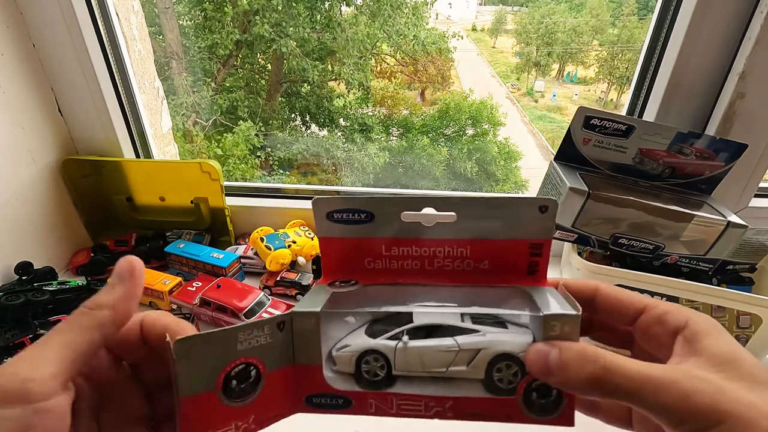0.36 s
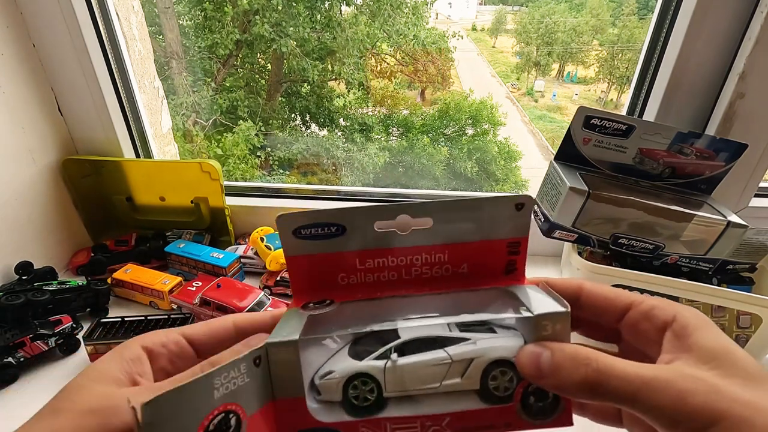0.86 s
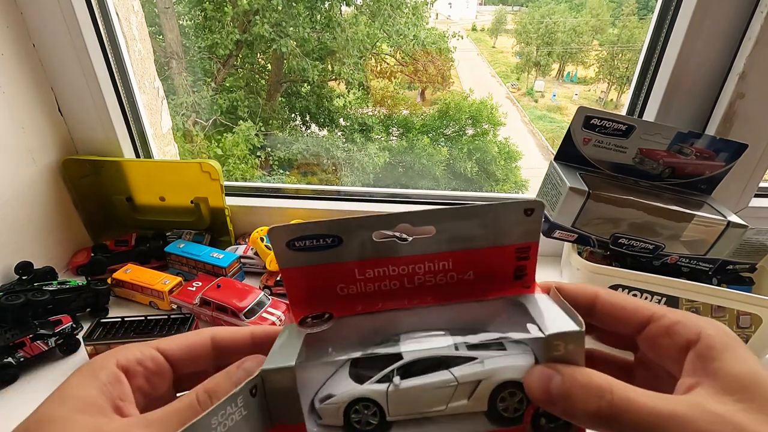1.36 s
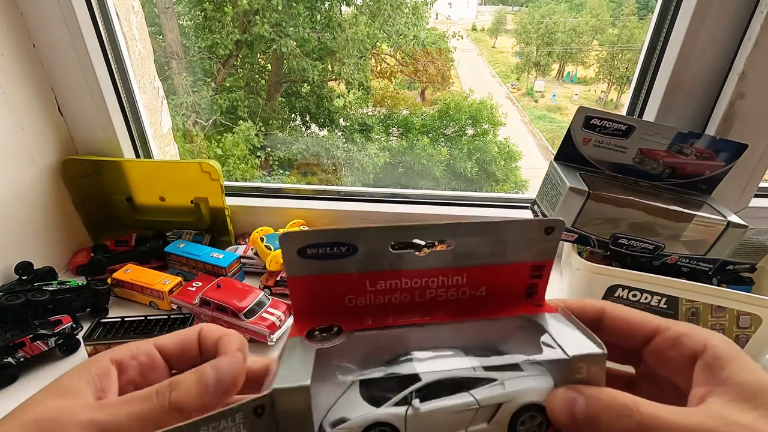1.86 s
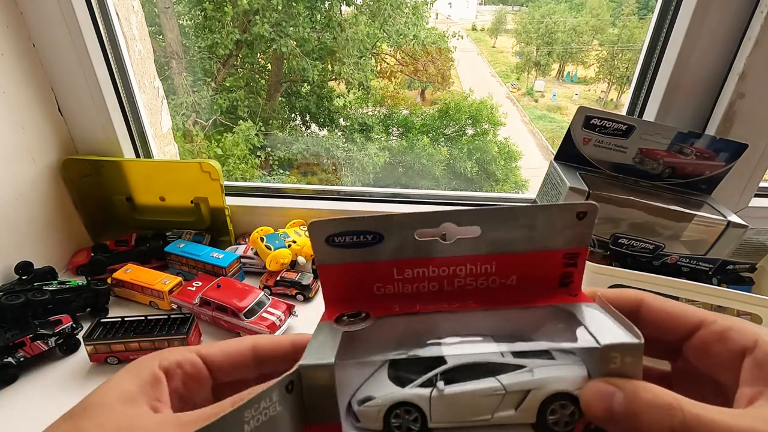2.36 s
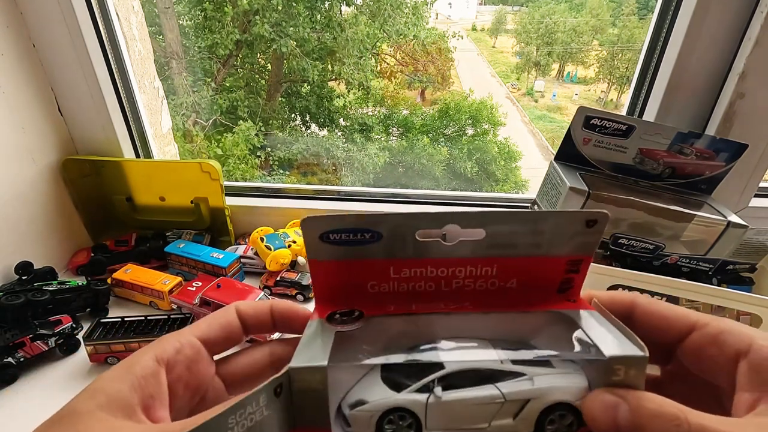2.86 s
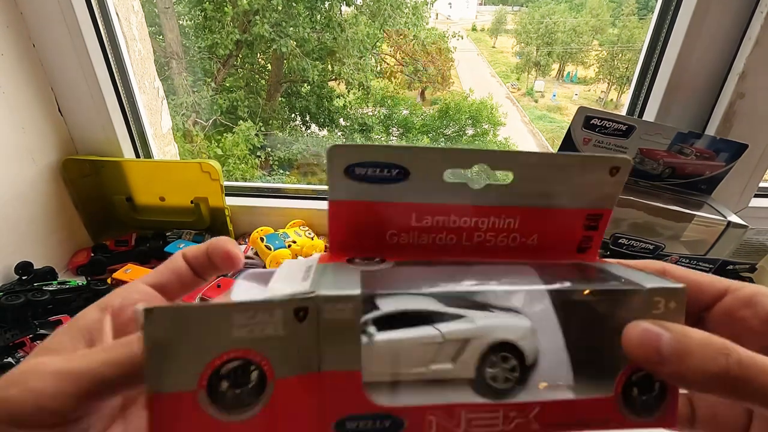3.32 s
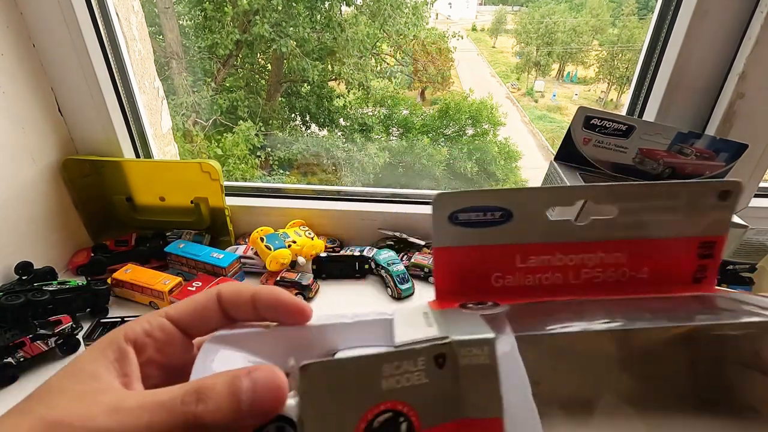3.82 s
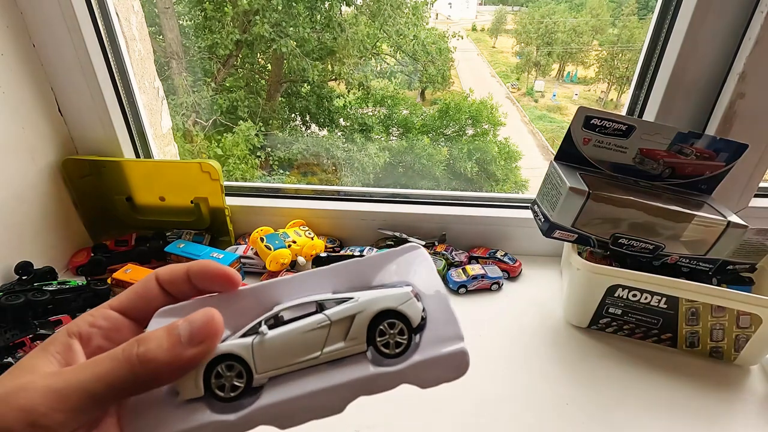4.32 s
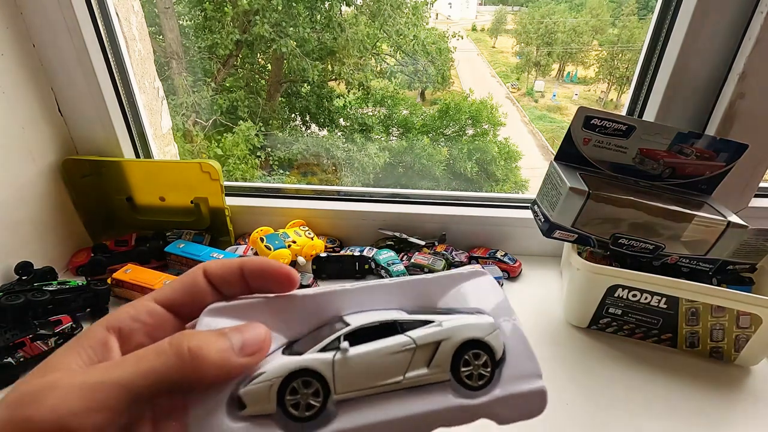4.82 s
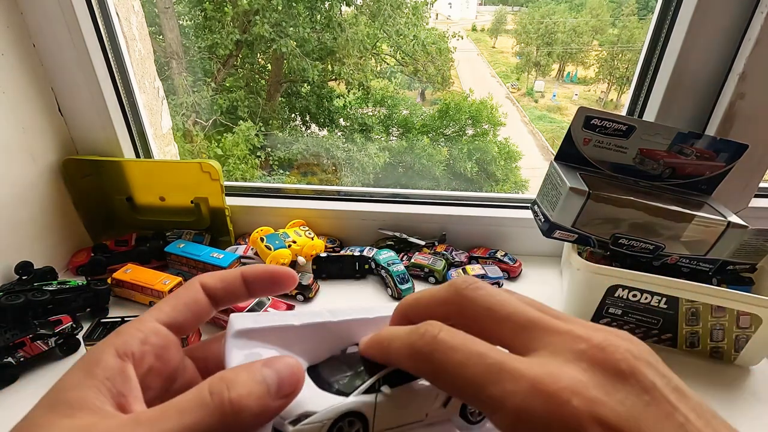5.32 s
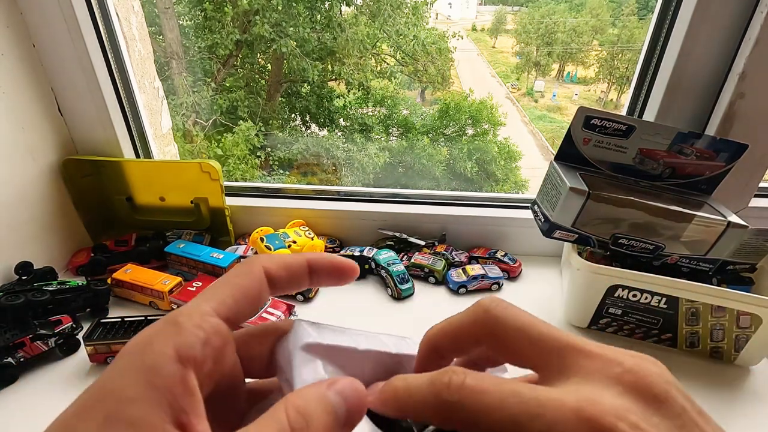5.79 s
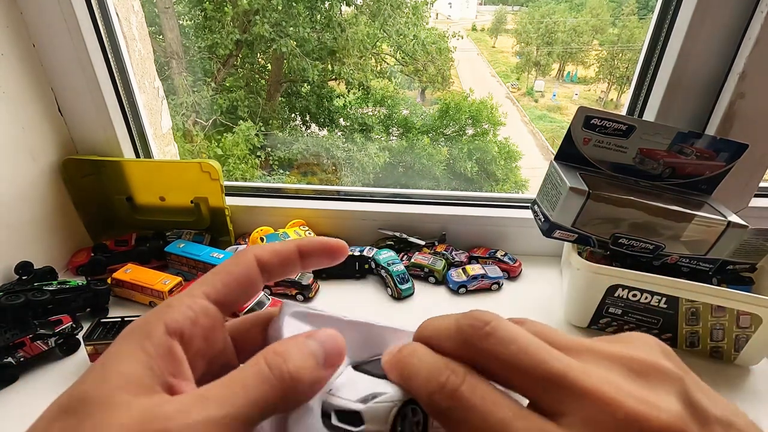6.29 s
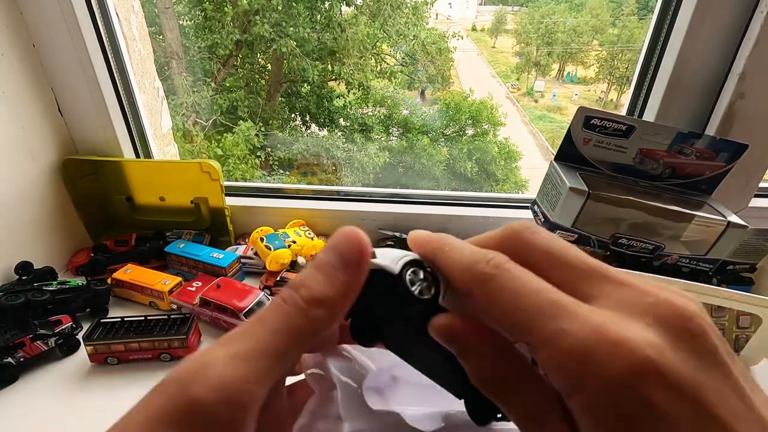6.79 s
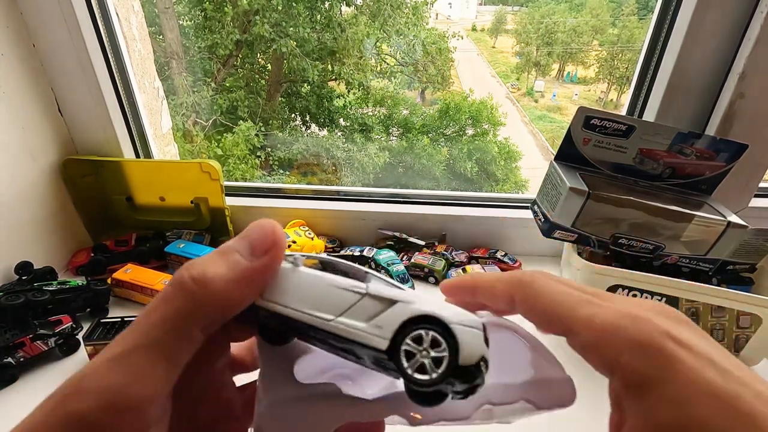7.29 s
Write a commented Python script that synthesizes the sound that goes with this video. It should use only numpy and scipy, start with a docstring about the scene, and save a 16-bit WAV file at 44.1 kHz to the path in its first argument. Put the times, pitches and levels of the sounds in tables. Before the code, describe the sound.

A small carton is worked open by hand, close to a stereo camera microphone: dry card cracks, short rubs, boxy thuds and pauses. The busiest stretch is the tray scraping out midway, ending with a knock on the sill. Then brittle plastic clicks grow into a dense crackle as a toy car is pried out, and light ticks of the bare tray follow. Faint room hum, very short dull reflections.

```python
"""On a window sill, hands open a small cardboard box, slide out a thin plastic tray and prise a metal toy car from it.
Card snaps and plastic pops are short noise bursts through a resonance, with ringing body modes and a treble crack.
Rubbing is stick-slip ticks through the modes of card, then tray, with dry hiss and a stirring hollow.
Thumps are sagging booms over damped box and sill modes; a bent flap groans as a gliding sine.
A quiet room hums behind as coloured noise, and decaying noise tails give the reflections."""
import sys
import numpy as np
from scipy import signal
from scipy.fft import rfft, irfft, next_fast_len
from scipy.io import wavfile
from scipy.ndimage import uniform_filter1d

SR = 44100
rng = np.random.default_rng(int(sys.argv[2]) if len(sys.argv) > 2 else 0)


def generate_wav(sig):
    """Save sig (samples, or channels by samples) to the path in sys.argv[1] as 16-bit PCM at SR."""
    pcm = np.round(np.clip(np.atleast_2d(sig).T, -1, 1) * 32767).astype(np.int16)
    wavfile.write(sys.argv[1], SR, pcm)


def attenuation_scalar(level_db):
    """Turn a level in dB into a linear amplitude multiplier (20 dB per decade)."""
    decades = np.asarray(level_db, float) / 20
    return 10 ** decades


N = 337806

# Colour of the outdoor wash and low hum. Each row: frequency in Hz, relative level in dB.
ROOM_TONE_COLOUR = [(15, -63), (28, -8), (70, -20.5), (108, -35.5), (173, -8), (197, -16.5), (235, -20.5),
                    (380, -32), (800, -47), (1540, -27), (2400, -52.5), (7400, -53.5), (12000, -74)]
# Colour of the difference between the channels. Each row: frequency in Hz, gain in dB.
SIDE_COLOUR = [(30, -17), (500, -10.5), (1500, -7.5), (4000, -5.5), (8000, -9), (14000, -2)]
# Share of the sound that leans to the right, most in bass and mids. Each row: frequency in Hz, gain in dB.
RIGHT_LEAN = [(30, -20), (700, -17.5), (3000, -23), (8000, -40)]
# A bent flap flexing back. Each row: start in seconds, length in seconds, from Hz, to Hz, level in dB.
GROANS = [(1.552, 0.053, 200, 337, -44)]
# Fingers, flaps and tray sliding.
# Each row: start in seconds, end in seconds, start level in dB, end level in dB, hiss in dB re level.
SLIDES = [(0.0, 0.07, -31.5, -29.5, -11.5), (0.113, 0.508, -45, -57, -8.5),
          (0.586, 0.598, -62.5, -55.5, -7.5), (0.804, 0.869, -65, -70.5, -7.5),
          (0.942, 1.039, -62, -61.5, -12.5), (1.162, 1.184, -61.5, -63, -17),
          (1.638, 1.758, -54.5, -69, -9), (1.851, 1.896, -59, -55, -5.5), (2.045, 2.144, -67.5, -58, -7.5),
          (2.197, 2.297, -40.5, -48, -14.5), (2.404, 2.576, -48, -58, -16.5), (2.635, 2.876, -44, -55, -9),
          (2.755, 3.057, -76, -46.5, -17), (3.112, 3.156, -33.5, -35.5, -11.5),
          (3.27, 3.378, -50, -37, -25), (3.383, 3.444, -28.5, -26.5, -12.5),
          (3.444, 3.502, -27, -28.5, -11), (3.568, 3.681, -31.5, -41, -15),
          (3.764, 3.799, -36.5, -35.5, -9.5), (3.828, 3.981, -39.5, -26.5, -9.5),
          (4.034, 4.139, -47, -64, 0), (4.427, 4.474, -61, -55, -14.5), (4.668, 4.819, -25.5, -56.5, -14.5),
          (5.176, 5.186, -34, -38, -14), (5.408, 5.519, -46.5, -60.5, -3.5),
          (5.744, 5.807, -65, -56.5, -7.5), (5.942, 6.036, -69.5, -51, -17), (6.127, 6.215, -61.5, -74, -9),
          (6.244, 6.41, -52.5, -49.5, -2), (6.387, 6.486, -62, -23.5, -10), (6.52, 6.703, -41.5, -56, -4),
          (6.772, 6.842, -61, -73, -9), (6.882, 6.959, -46, -58.5, 0), (7.14, 7.285, -63, -54, -15),
          (7.374, 7.395, -43.5, -55, -14), (7.595, 7.661, -42, -39.5, -14.5)]
# Sheets that spring free and rustle as they settle. Each row: time in seconds, level in dB.
JOLTS = [(0.677, -45), (1.512, -49), (1.962, -35.5), (2.611, -37), (5.044, -51.5), (5.377, -46.5),
         (5.656, -54), (7.026, -55.5), (7.093, -45.5), (7.463, -44)]
# The box drags over the sill and its hollow drones.
# Each row: start in seconds, end in seconds, start level in dB, end level in dB.
DRAGS = [(0.092, 0.145, -35.5, -45), (1.979, 2.006, -41, -51.5), (4.659, 4.767, -30, -39.5)]
# Colour of scraping and of broad snaps. Each row: frequency in Hz, gain in dB.
RUB_COLOUR = [(200, -45), (450, -2), (900, -0.5), (1700, 0.5), (2400, -1.5), (3500, -8), (5500, -18),
              (9000, -75)]
# Treble of card, in hiss and cracks. Each row: frequency in Hz, gain in dB.
CARD_TREBLE = [(2000, -40), (3500, -7), (4600, -11), (7400, -12.5), (10000, -24.5), (12000, -28),
               (15500, -50.5)]
# Brighter treble of plastic, in hiss and cracks. Each row: frequency in Hz, gain in dB.
PLASTIC_TREBLE = [(2000, -35), (3500, -3), (4600, -2), (7400, -4.5), (9500, -15.5), (12500, -20),
                  (15500, -43.5)]
# Edges of the parts of the hiss that swell apart. Each entry: frequency in Hz.
HISS_BAND_EDGES_HZ = [3000, 4500, 6200, 8500]
# Resonances of the cardboard walls. Each row: frequency in Hz, relative level in dB, t60 in seconds.
BOX_MODES = [(540, -14.5, 0.051), (689.5, -6.5, 0.037), (960, -4.5, 0.038), (1270, -1.5, 0.018),
             (1700, 4, 0.0085), (2200, -5.5, 0.0018), (2620, -20.5, 0.005), (3220, -15, 0.03)]
# Resonances of the plastic tray. Each row: frequency in Hz, relative level in dB, t60 in seconds.
TRAY_MODES = [(1100, -19, 0.088), (1542, -9.5, 0.015), (2280, -8, 0.014), (2600, -3.5, 0.012),
              (3050, -14, 0.028)]
# Resonances of the sill board. Each row: frequency in Hz, relative level in dB, t60 in seconds.
SILL_MODES = [(480, -10, 0.27), (600.6, 0.5, 0.12), (611, -7, 0.3), (697, -5.5, 0.27), (781, -11, 0.16),
              (935, -8, 0.1)]
# Resonances of the hollow box. Each row: frequency in Hz, relative level in dB, t60 in seconds.
HOLLOW_MODES = [(55, -24.5, 0.11), (94.5, -28.5, 0.086), (152, -3.5, 0.18), (204, -5.5, 0.18),
                (268, 9, 0.038), (319.4, 2.5, 0.081)]
# Low thumps. Each row: time in seconds, boom peak in dB, boom pitch in Hz, sill ring in dB re peak,
# upper sill modes in dB re their place in the sill table.
THUMPS = [(0.086, -11.5, 254.6, -16, 10.5), (0.303, -31, 225, -6.5, 12), (0.628, -42, 230, -27.5, -3.2),
          (1.5165, -22, 287, -13, 4), (1.947, -23.5, 75, -6.5, 7.5), (2.19, -41.5, 267, 7, 3),
          (2.411, -38, 160, 0, 7.5), (2.536, -26, 237, -12.5, 4), (2.598, -21, 230, -3, -1),
          (3.105, -21.5, 290, -29, 10), (3.452, -22.5, 299, -21, 2), (3.505, -23.5, 273, -27, 3.5),
          (3.568, -11.5, 149.4, -19, -20), (3.692, -33.5, 131, -4, -1), (4.021, -27.5, 150.3, -22.5, 4.5),
          (4.454, -34, 167, -32, 3.5), (4.619, -22, 272.5, -16.5, 2), (4.64, -21, 321, -0.5, 1.5),
          (5.144, -35, 133, -11, 7.5), (5.371, -49.5, 247, 1, 7.5), (6.424, -30, 268, 0.5, -3),
          (6.469, -25, 363, -17, 3), (6.503, -29, 152, -14, 19), (6.705, -51, 275, 2.5, 16),
          (6.865, -34.5, 276, 3.5, 8), (7.016, -40, 395, 9, 2.5), (7.103, -54, 263, 9, -7),
          (7.444, -37.5, 229, 6, -5), (7.606, -28.5, 268, -9, 2)]
# Cardboard snaps. Each row: time in seconds, peak in dB, ring pitch in Hz, crack in dB re peak,
# ring t60 in seconds (held within 0.006 to 0.2).
BOX_SNAPS = [(.028, -16.5, 1700, -7, 0.11), (.0455, -22, 1460, -30.5, 0.068),
             (.0598, -20.5, 1534, -24, 0.037), (.0749, -24.5, 3400, -12.5, 0.0082),
             (.0816, -9.5, 1550, -7.5, 0.018), (.2102, -24, 3000, -9.5, 0.024),
             (.2165, -35, 1320, -25, .015), (.276, -41, 4640, -5, 0.018), (.2889, -55, 1413, -4, 0.017),
             (.3056, -27.5, 1050, -5.5, 0.022), (.3715, -34.5, 2020, -40, 0.033),
             (.498, -38.5, 704, -8.5, 0.082), (.6015, -47.5, 3500, -9, 0.033),
             (.6612, -24.5, 1544, -13.5, 0.021), (.8098, -41, 1270, -42, 0.031),
             (1.0315, -35, 607, -19.5, 0.027), (1.4562, -42, 760, -26, 0.021),
             (1.5, -29.5, 700, -16.5, 0.058), (1.5161, -23.5, 726, -24, 0.036),
             (1.6215, -59, 800, -26, 0.018), (1.6838, -39, 1820, -12, 0.026),
             (1.8032, -47, 1410, -34, 0.021), (1.9455, -20, 1340, -16.5, 0.058),
             (2.1408, -31.5, 1870, -16.5, 0.039), (2.1847, -29, 1830, -21, 0.019),
             (2.1916, -27.5, 1840, -40, 0.029), (2.2106, -26, 1230, -40, 0.023),
             (2.2706, -32.5, 1320, -10, 0.014), (2.343, -40.5, 600, -30, .025),
             (2.384, -39, 890, -19, 0.045), (2.4147, -29, 1270, -18, 0.044),
             (2.4576, -19, 1270, -32, 0.017), (2.5368, -22.5, 627, -30, 0.028),
             (2.5972, -8, 650, -20.5, 0.043), (2.7561, -42, 1600, -23, 0.0055),
             (2.9084, -28, 1210, -14, 0.012), (2.9494, -36.5, 1090, -21, 0.018),
             (2.9856, -35, 1500, -14.5, 0.021), (3.0147, -25, 1260, -14.5, 0.027),
             (3.0867, -26, 580, -33.5, 0.012), (3.0994, -25.5, 1670, -2, 0.013),
             (3.1093, -12.5, 1560, -13, 0.0042), (3.1154, -21, 480, -17, 0.0095),
             (3.1601, -22.5, 1600, -14, 0.06), (3.2712, -13.5, 1590, -24, 0.015),
             (3.452, -22.5, 1623, -8.5, .014), (3.4612, -21.5, 746, -13, 0.091),
             (3.4772, -13.5, 2800, -25.5, 0.016), (3.5146, -11, 1940, -7, 0.018),
             (3.5652, -15.5, 1270, -5, 0.041), (3.6271, -20, 960, -12.5, 0.091),
             (3.697, -21.5, 940, -18, 0.061), (3.765, -34, 900, -6, 0.042), (3.781, -32.5, 930, -6, .03),
             (3.8232, -25.5, 1250, -26, 0.016), (3.876, -27.5, 3130, -9.5, 0.071),
             (3.9305, -18.5, 1820, -16, 0.014), (3.9432, -19.5, 1000, -22, 0.2),
             (3.988, -21.5, 980, -5.5, 0.058), (4.0007, -18.5, 1940, 4.5, 0.043),
             (4.088, -42.5, 420, -19, 0.033), (4.3142, -52, 876, -34.5, 0.045),
             (4.415, -26, 1070, -26, 0.036), (4.4574, -33.5, 882, -20.5, 0.044),
             (4.5161, -45, 900, -24, 0.12), (4.5821, -36, 790, -16.5, 0.052),
             (4.6135, -30.5, 893, -24, 0.035), (4.6215, -20, 935, -19.5, 0.064),
             (4.6358, -16, 1100, -10, 0.078), (4.6454, -13.5, 860, -28.5, 0.031),
             (4.864, -51, 1510, -9.5, 0.18)]
# Plastic tray pops. Each row: time in seconds, peak in dB, ring pitch in Hz, crack in dB re peak,
# ring t60 in seconds (held within 0.006 to 0.2).
TRAY_POPS = [(5.0341, -34, 2280, -9, 0.0097), (5.0449, -28, 1270, -25, 0.02), (5.133, -27.5, 1600, -8, .04),
             (5.1408, -22.5, 1700, -8, 0.15), (5.1888, -24.5, 1150, -14, 0.023),
             (5.2025, -25.5, 1010, -29, 0.016), (5.3078, -38.5, 2620, -12, 0.053),
             (5.357, -39, 1100, -15, 0.027), (5.3684, -17, 1440, -1.5, 0.04),
             (5.4552, -35, 1150, -13.5, 0.03), (5.4885, -33, 965, -10, 0.02), (5.5217, -42, 2410, -4, 0.03),
             (5.6315, -39, 1184, -45, 0.014), (5.6461, -38.5, 1316, -16, 0.035),
             (5.699, -47.5, 780, -42, 0.043), (5.7459, -38, 1550, -4, 0.055),
             (5.7938, -40.5, 620, -22, 0.011), (5.952, -45.5, 1360, -7, 0.032),
             (5.9829, -34.5, 1480, -18.5, 0.021), (6.0249, -44, 1490, -13, 0.015),
             (6.0505, -46, 1500, -19, 0.018), (6.1175, -38.5, 1630, -5.5, 0.028),
             (6.1732, -39.5, 1910, -5.5, 0.013), (6.2446, -18.5, 1200, 1.5, 0.025),
             (6.2684, -24, 1370, -10, 0.021), (6.2812, -33, 3900, 10.5, 0.017), (6.331, -44, 7000, 8, .01),
             (6.3445, -46, 6000, 4, .01), (6.3804, -17, 2350, -3, 0.017),
             (6.4105, -23.5, 1020, -11.5, 0.079), (6.4246, -14, 1560, -31, 0.019),
             (6.4557, -17.5, 1040, -9, 0.042), (6.469, -20.5, 3220, 2, 0.029),
             (6.488, -17, 1230, 6.5, 0.023), (6.5118, -15.5, 1170, -15, 0.034),
             (6.5193, -14, 3250, 0, 0.012), (6.561, -36, 2830, -30, .03), (6.5788, -28.5, 3100, -27, 0.058),
             (6.6882, -34.5, 2880, -32, 0.017), (6.7944, -32, 2580, -13, 0.044),
             (6.8546, -29, 2580, 11, 0.051), (6.8671, -18, 2800, -7, 0.047),
             (6.8823, -29, 2920, -20, 0.052), (6.8907, -29, 2800, -14, 0.057),
             (6.9827, -35, 2200, -3, 0.025), (7.0144, -27.5, 1870, -11, 0.089),
             (7.072, -33, 4740, -2.5, 0.045), (7.0775, -36, 3390, -8, 0.036),
             (7.0905, -33, 3000, -11, .014), (7.098, -34, 2770, -22, 0.017),
             (7.1034, -32, 2800, -7.5, 0.032), (7.1611, -42.5, 2860, -0.5, 0.025),
             (7.1745, -37, 3050, -19, 0.034), (7.183, -31.5, 3340, -15, 0.046),
             (7.1895, -46, 2730, -15, 0.016), (7.238, -54, 2200, -3, 0.014), (7.259, -46, 1100, -11, 0.033),
             (7.2818, -36, 2400, -8, 0.046), (7.3553, -33.5, 2720, 0.5, 0.055),
             (7.365, -29.5, 2860, -13, 0.042), (7.403, -42, 2800, -12, 0.024),
             (7.4076, -33.5, 2920, -21, 0.025), (7.4193, -46, 2740, 3, 0.019),
             (7.4255, -48, 2700, -19, 0.023), (7.4455, -25.5, 1640, -10, 0.038),
             (7.45, -20.5, 2930, -5.5, 0.061), (7.4639, -28.5, 2920, -45, 0.021),
             (7.518, -43, 1500, -14, 0.043), (7.5609, -22.5, 1700, -21.5, 0.012),
             (7.5917, -22.5, 2830, -26, 0.071), (7.6057, -25, 1650, -12, 0.025),
             (7.625, -31, 2800, -7.5, 0.041)]

ROOM_TONE_DB = -65
ROOM_T60_S, ROOM_DB, ROOM_TOP_HZ = 0.05, -17.5, 5000
PLASTIC_HISS_FROM_S = 4.95  # from here the rubbing hisses with the brighter treble of plastic
BARE_TRAY_FROM_S = 6.53  # the car comes free and the bare tray rattles
HOLD_DB, HOLD_HISS_DB = -77, -11.5  # hands never rest quite still; hiss re level
JOLT_HISS_DB, RISE_DB_PER_S, FALL_DB_PER_S = -15.5, 450.5, 285
RUMBLE_DB, RUMBLE_FOLLOWS = -58.5, 0.63  # level under a rub of -50 dB; dB per dB of rub
BARE_TRAY_RUMBLE_DB = -5  # change once the tray is bare
BOOM_CYCLES, BOOM_LONGEST_S = 12, 0.068  # a boom dies by 60 dB in this many cycles, or sooner in the hand
BOOM_SAG, SAG_S = .3, .008  # a boom starts higher by this share and sinks as the card slackens
NEAR_DB_PER_OCTAVE = 6  # hollow modes far from the boom are stirred less
SILL_MIDDLE_HZ = 660  # parts lower from upper sill modes
SILL_WAVER_DB = 4.5  # the ring wavers as the box shifts on the sill
FACET_T60_S = .022  # longest ring of a small facet


def colour(x, points):
    """Shape the spectrum with a causal minimum-phase filter through (Hz, dB) points."""
    hz, db = np.transpose(points)
    bins_hz = np.fft.rfftfreq(4096, 1 / SR)
    log_gain = np.log(attenuation_scalar(np.interp(np.log(bins_hz + 1), np.log(hz), db)))
    # folding the cepstrum onto positive time makes the filter causal
    cepstrum = irfft(log_gain)
    cepstrum[1:2048] *= 2
    cepstrum[2049:] = 0
    impulse = irfft(np.exp(rfft(cepstrum)))
    return signal.fftconvolve(x, impulse)[:len(x)]


def unit(x):
    """Scale to rms 1."""
    return x / np.sqrt(np.mean(x ** 2))


def peak(x, db):
    """Scale the highest point of the short-time envelope to db."""
    return x * attenuation_scalar(db) / np.sqrt(2 * np.max(uniform_filter1d(x ** 2, size=66)))


def ring(t, hz, db, t60, phase):
    """Sum damped sine modes, as a struck body rings."""
    waves = np.sin(2 * np.pi * hz[:, None] * t + phase[:, None])
    decay = 1000. ** (-t / t60[:, None])
    return np.sum(attenuation_scalar(db)[:, None] * waves * decay, axis=0)


def walk(rate):
    """Random levels held for 1 / rate seconds and slewed; rms 1."""
    k = int(SR / rate)
    held = np.repeat(rng.standard_normal(N // k + 1), k)
    return unit(uniform_filter1d(held, k)[:N])


def resonate(x, modes):
    """Drive a body continuously: one decaying resonator for each (Hz, dB, t60) mode."""
    out = 0
    for hz, db, t60 in modes:
        pole = np.exp(2j * np.pi * hz / SR - np.log(1000) / (t60 * SR))
        out = out + attenuation_scalar(db) * signal.lfilter([1], [1, -pole], x).imag
    return out


def room_tone():
    """Faint outdoor wash and low hum: coloured noise with a wavering level."""
    wash = colour(rng.standard_normal(N), ROOM_TONE_COLOUR)
    return attenuation_scalar(ROOM_TONE_DB) * unit(wash * attenuation_scalar(1.1 * walk(15)))


def echo(x, t60, delay_s):
    """Scatter of reflections: a decaying noise tail of energy 1 after a delay."""
    t = np.arange(SR // 2) / SR
    tail = rng.standard_normal(len(t)) * 1000. ** (-t / t60) * (t > delay_s)
    return signal.fftconvolve(x, tail / np.sqrt(np.sum(tail ** 2)))[:N]


def room_reflections(near):
    """The room answers late and dull, as its surfaces swallow treble."""
    duller = signal.butter(1, ROOM_TOP_HZ, fs=SR)
    return attenuation_scalar(ROOM_DB) * signal.lfilter(*duller, echo(near, ROOM_T60_S, delay_s=0.013))


def stereo(near):
    """Close reflections reach the two microphone ports unalike, and change as the hands move."""
    reflections = sum(walk(12) * echo(near, t60=0.016, delay_s=0.) for _ in range(3)) / 2
    side = colour(reflections, SIDE_COLOUR)
    lean = colour(near, RIGHT_LEAN)
    return near + (side - lean) * np.array([[1], [-1]])


def groans():
    """A bent flap hums as it relaxes, its pitch rising with the tension."""
    out = np.zeros(N)
    for s, length, from_hz, to_hz, db in GROANS:
        u = np.arange(int(length * SR)) / (length * SR)
        hz = from_hz + (to_hz - from_hz) * np.sin(np.pi / 2 * u)
        hum = np.sin(np.pi * u) * np.sin(2 * np.pi * np.cumsum(hz) / SR)
        out[int(s * SR):int(s * SR) + len(u)] += attenuation_scalar(db) * hum
    return out


def slips(per_s, scatter_db):
    """Stick-slip ticks at random moments, of mildly uneven size."""
    out, count = np.zeros(N), int(per_s * N / SR)
    when = rng.integers(0, N, count)
    out[when] = rng.standard_normal(count) * attenuation_scalar(scatter_db * rng.exponential(size=count))
    return out


def crinkles(count, low_hz, octaves, cycles, scatter_db, db):
    """Small creases give way at random moments, each ringing briefly at its own pitch."""
    out, t = np.zeros(N + SR), np.arange(SR // 20) / SR
    for when, pitch, size in rng.random((count, 3)):
        hz, i = low_hz * 2 ** (octaves * pitch), int(when * N)
        tick = np.sin(2 * np.pi * hz * t) * 1000. ** (-t * hz / cycles)
        out[i:i + len(t)] += attenuation_scalar(-scatter_db * np.log(size)) * tick
    return attenuation_scalar(db) * unit(out[:N])


def shifting(x, swing_db, rate):
    """Parts of the spectrum swell and fade apart as the contact moves over the sheet."""
    size = next_fast_len(N)
    spectrum = rfft(x, size)
    part = np.digitize(np.fft.rfftfreq(size, 1 / SR), HISS_BAND_EDGES_HZ)
    return sum(irfft(spectrum * (part == k))[:N] * attenuation_scalar(swing_db * walk(rate))
               for k in range(len(HISS_BAND_EDGES_HZ) + 1))


def stroke_db(t, start, end, start_db, end_db):
    """One stroke in dB: it rises, runs its course and dies away."""
    course = np.interp(t, [start, end], [start_db, end_db])
    return course - RISE_DB_PER_S * np.maximum(start - t, 0) - FALL_DB_PER_S * np.maximum(t - end, 0)


def strokes():
    """Level, hiss and rumble of the rubbing in dB: the powers of all strokes add up."""
    coarse, t = np.arange(0, N, 32) / SR, np.arange(N) / SR
    level, hiss = attenuation_scalar(HOLD_DB) ** 2, attenuation_scalar(HOLD_DB + HOLD_HISS_DB) ** 2
    jolts = [(s, s, db, db, JOLT_HISS_DB) for s, db in JOLTS]
    for start, end, start_db, end_db, hiss_db in SLIDES + jolts:
        db = stroke_db(coarse, start, end + 1e-6, start_db, end_db)
        level = level + attenuation_scalar(db) ** 2
        hiss = hiss + attenuation_scalar(db + hiss_db) ** 2
    level_db, hiss_db = (np.interp(t, coarse, 10 * np.log10(p)) for p in (level, hiss))
    rumble_db = RUMBLE_DB + RUMBLE_FOLLOWS * (level_db + 50)
    rumble = attenuation_scalar(rumble_db + BARE_TRAY_RUMBLE_DB * (t > BARE_TRAY_FROM_S)) ** 2
    for drag in DRAGS:
        rumble += attenuation_scalar(stroke_db(t, *drag)) ** 2
    return level_db, hiss_db, 10 * np.log10(rumble)


def rubbed_sheet(modes):
    """Slips ring the held sheet, each mode from its own spot as the grip shifts."""
    return unit(sum(resonate(slips(per_s=900, scatter_db=2.0), [m]) * attenuation_scalar(3.7 * walk(28)) for m in modes))


def rub(level_db, hiss_db, rumble_db):
    """Slips under the fingers ring card or tray, scrape and hiss; the hollow stirs below."""
    t = np.arange(N) / SR
    ticks, judder_db = slips(per_s=2200, scatter_db=0.5), 0.26 * walk(150)
    card, tray = rubbed_sheet(BOX_MODES), rubbed_sheet(TRAY_MODES)
    sheet = np.where(t < BARE_TRAY_FROM_S, card, attenuation_scalar(-1.5) * tray)
    scrape = unit(colour(ticks + 0.48 * rng.standard_normal(N), RUB_COLOUR))
    sheet = unit((sheet + attenuation_scalar(-6.0) * scrape) * attenuation_scalar(judder_db + 2.7 * walk(70)))
    sheet += crinkles(count=700, low_hz=900, octaves=2.6, cycles=53, scatter_db=4.0, db=-7.5)
    grit = ticks + 1.1 * rng.standard_normal(N)
    card_hiss, plastic_hiss = unit(colour(grit, CARD_TREBLE)), unit(colour(grit, PLASTIC_TREBLE))
    hiss = np.where(t < PLASTIC_HISS_FROM_S, card_hiss, plastic_hiss)
    hiss = unit(shifting(hiss, swing_db=3.0, rate=14) * attenuation_scalar(judder_db + 2.2 * walk(70)))
    rumble = unit(resonate(rng.standard_normal(N), HOLLOW_MODES) * attenuation_scalar(0.74 * walk(30)))
    return attenuation_scalar(level_db) * sheet + attenuation_scalar(hiss_db) * hiss + attenuation_scalar(rumble_db) * rumble


def thumps(hollow_db, rise_s):
    """Heavier pushes boom at a pitch set by the grip, stir the hollow of the box and leave the sill ringing."""
    out, t = np.zeros(N + SR), np.arange(SR // 3) / SR
    hollow_hz, hollow_mode_db, hollow_t60 = np.transpose(HOLLOW_MODES)
    sill_hz, sill_mode_db, sill_t60 = np.transpose(SILL_MODES)
    chance = rng.standard_normal((len(THUMPS), 3, len(HOLLOW_MODES)))
    wavers = rng.standard_normal((len(THUMPS), 30))
    rise = 1 - np.exp(-t / rise_s)
    sagging = t + BOOM_SAG * SAG_S * (1 - np.exp(-t / SAG_S))
    for (s, db, hz, sill_db, upper_db), c, waver in zip(THUMPS, chance, wavers):
        boom = np.sin(2 * np.pi * hz * sagging) * 1000. ** (-t / min(BOOM_CYCLES / hz, BOOM_LONGEST_S))
        far_db = NEAR_DB_PER_OCTAVE * np.abs(np.log2(hollow_hz / hz))
        stirred_db = hollow_mode_db + hollow_db - far_db + 1.5 * c[1]
        boom += ring(t, hollow_hz * (1 + 0.05 * c[0]), stirred_db, hollow_t60, 2 * c[2])
        board_db = sill_mode_db + upper_db * (sill_hz > SILL_MIDDLE_HZ) + 2 * c[0]
        board = ring(t, sill_hz * (1 + .006 * c[2]), board_db, sill_t60, 2 * c[1])
        board *= attenuation_scalar(SILL_WAVER_DB * np.interp(t, np.linspace(0, t[-1], len(waver)), waver))
        out[int(s * SR):int(s * SR) + len(t)] += peak(rise * boom, db) + peak(rise * board, db + sill_db)
    return out[:N]


def snaps(table, modes, treble, patch_q, broad_db, body_db, crack_share, rise_s, strike, facet_db):
    """Each buckle is a burst of tiny slips: it rings its own patch of sheet and the body, and cracks in the treble."""
    out, t = np.zeros(N + SR), np.arange(SR // 8) / SR
    mode_hz, mode_db, mode_t60 = np.transpose(modes)
    chance = rng.standard_normal((len(table), 3, len(modes)))
    facets = rng.random((len(table), 3, 5))
    white = rng.standard_normal((len(table), len(t)))
    white *= 1 + strike * np.exp(-t / 0.00025)  # the first slip is the largest
    broad, hiss = (colour(white.ravel(), c).reshape(white.shape) for c in (RUB_COLOUR, treble))
    rise = 1 - np.exp(-(t / rise_s) ** 2)
    for k, (s, db, hz, crack_db, t60) in enumerate(table):
        c, t60 = chance[k], np.clip(t60, .006, .2)
        burst = rise * broad[k] * 1000. ** (-t / t60)
        patch = peak(signal.lfilter(*signal.iirpeak(hz, patch_q, fs=SR), burst), 0)
        # a dull knock stays on its pitch, a sharp snap spreads over the whole sheet
        patch += peak(burst, broad_db + 1.2 * crack_db)
        body = rise * ring(t, mode_hz * (1 + .03 * c[0]), mode_db + 4.0 * c[1], mode_t60, 2 * c[2])
        crack = peak(rise * hiss[k] * 1000. ** (-t / (crack_share * t60)), 0)
        # small facets of the sheet ring briefly, each snap at other pitches
        pitch, size, phase = facets[k]
        facet_t60 = min(t60, FACET_T60_S) * np.ones(5)
        tiny = ring(t[:2000], 2500 * 3.5 ** pitch, -9 * size, facet_t60, 2 * np.pi * phase)
        crack[:2000] += peak(rise[:2000] * tiny, facet_db)
        snap = peak(patch, db) + peak(body, db + body_db) + peak(crack, db + crack_db)
        out[int(s * SR):int(s * SR) + len(t)] += snap
    return out[:N]


def scene():
    """Mix the room tone and the handling, then add the room's reflections and spread the sound in stereo."""
    near = room_tone() + groans() + rub(*strokes())
    near += thumps(hollow_db=-5, rise_s=0.0019)
    near += snaps(BOX_SNAPS, BOX_MODES, CARD_TREBLE, patch_q=5.1, broad_db=7.5, body_db=-8.5,
                  crack_share=0.97, rise_s=0.00061, strike=0.64, facet_db=-2.5)
    near += snaps(TRAY_POPS, TRAY_MODES, PLASTIC_TREBLE, patch_q=4.6, broad_db=3.0, body_db=-8.0,
                  crack_share=0.93, rise_s=0.00054, strike=3.2, facet_db=-4.5)
    near += room_reflections(near)
    return stereo(near)


def top_cut(x):
    """Nothing passes above the cut-off."""
    return signal.sosfilt(signal.butter(12, 16480, fs=SR, output="sos"), x)


def record(dry):
    """A camera microphone pair that rolls off in the deep bass and at the very top."""
    no_deep_bass = signal.sosfilt(signal.butter(2, 35, "high", fs=SR, output="sos"), dry)
    mix = signal.sosfilt(signal.butter(6, 15200, fs=SR, output="sos"), no_deep_bass)
    return top_cut(mix)


dry = scene()
out = record(dry)
generate_wav(out)
```